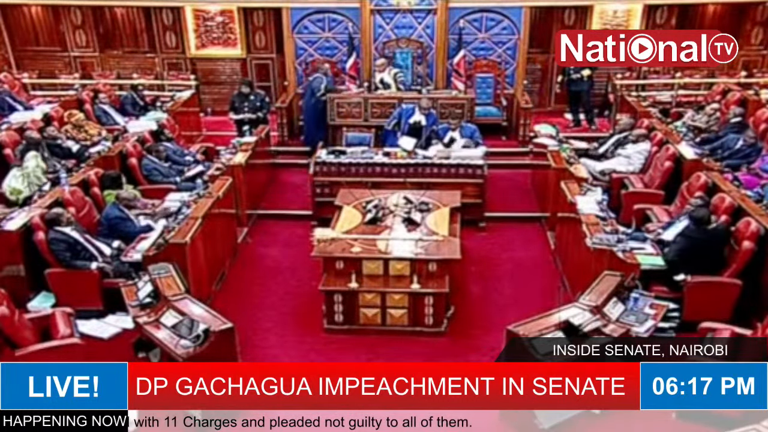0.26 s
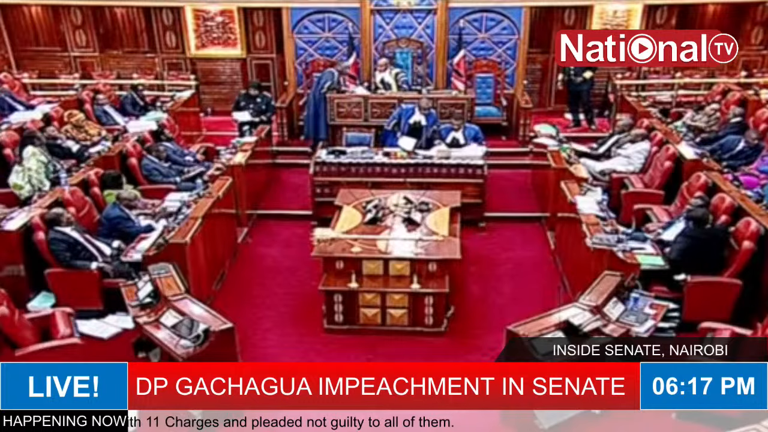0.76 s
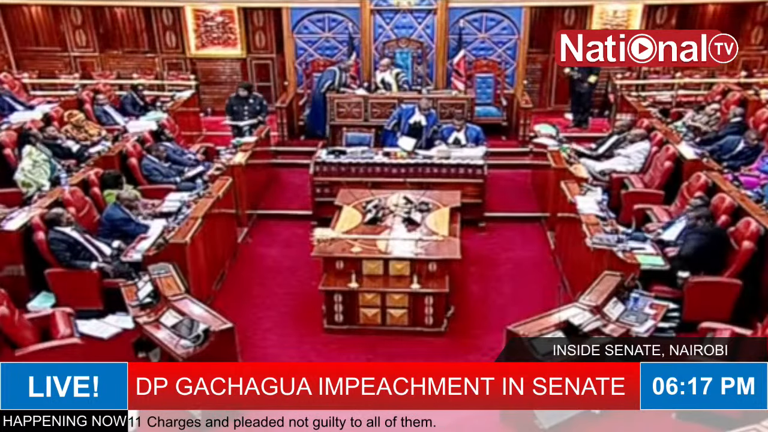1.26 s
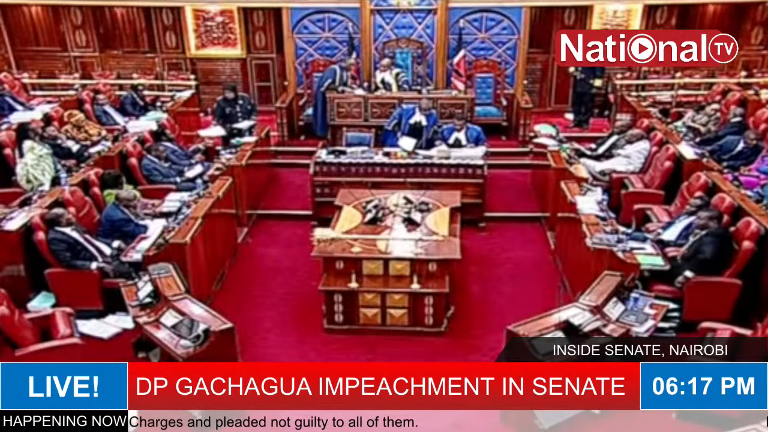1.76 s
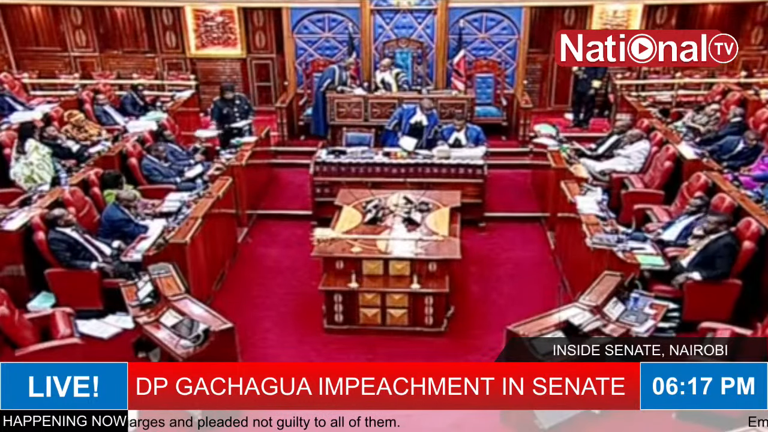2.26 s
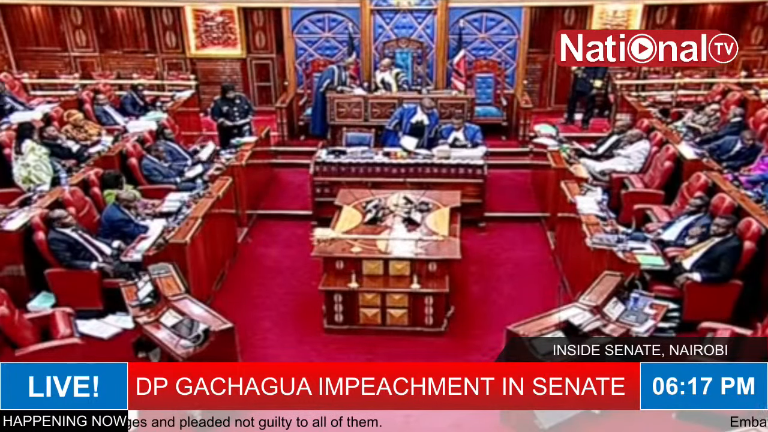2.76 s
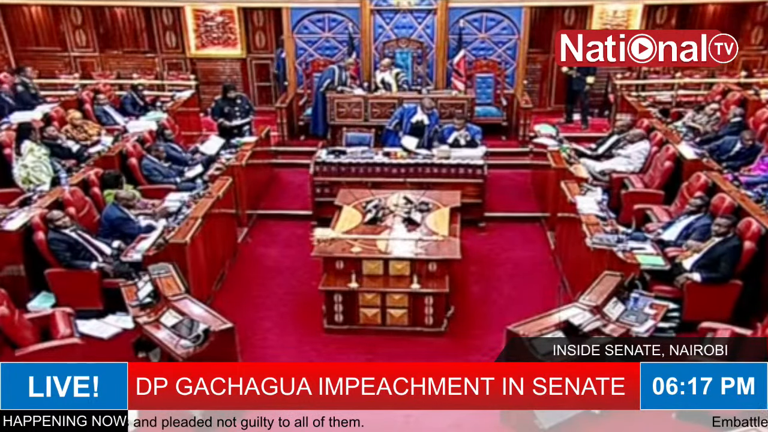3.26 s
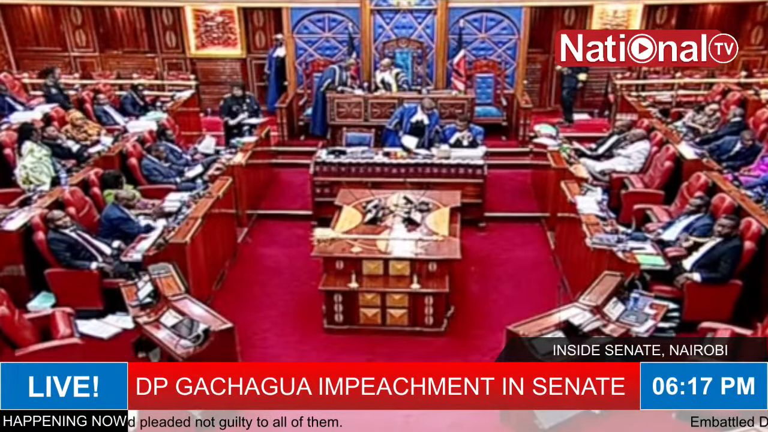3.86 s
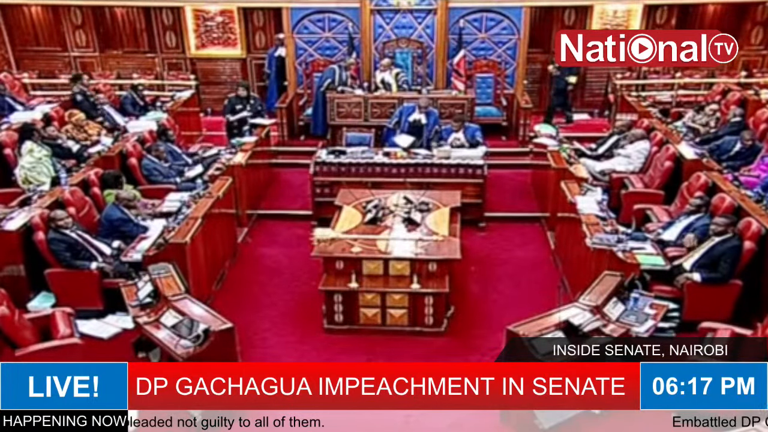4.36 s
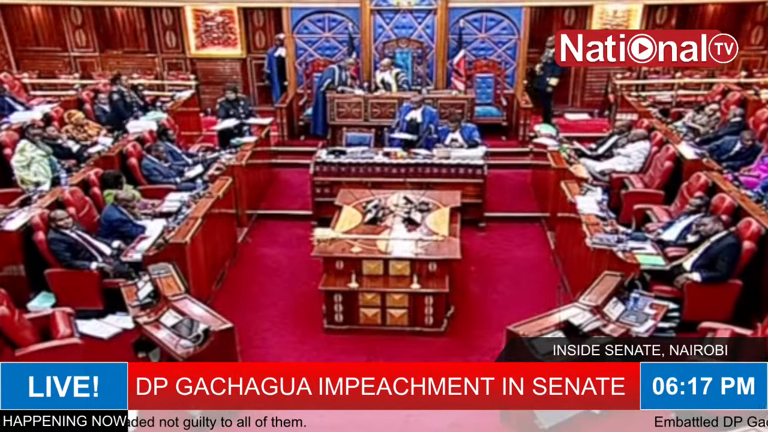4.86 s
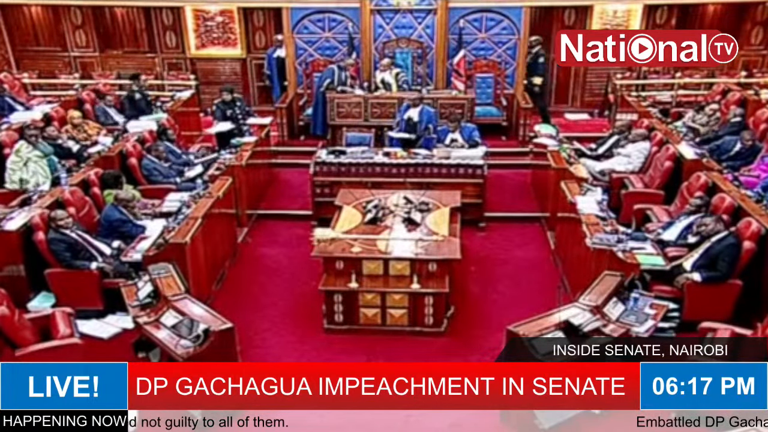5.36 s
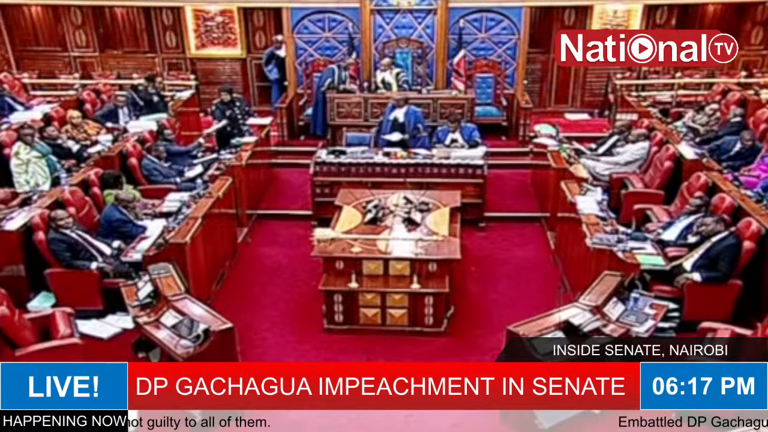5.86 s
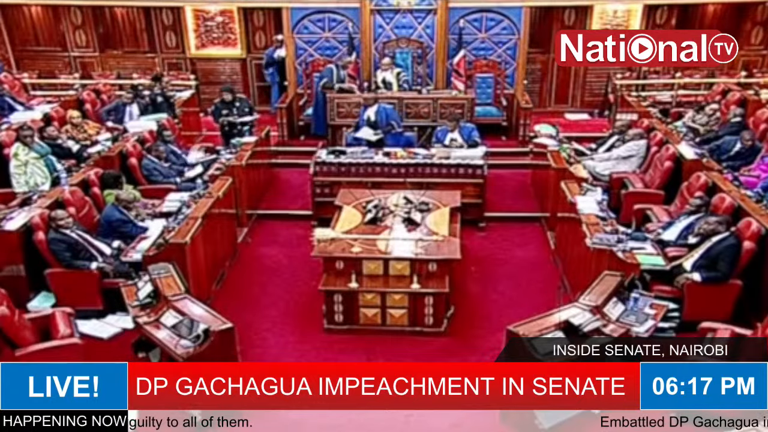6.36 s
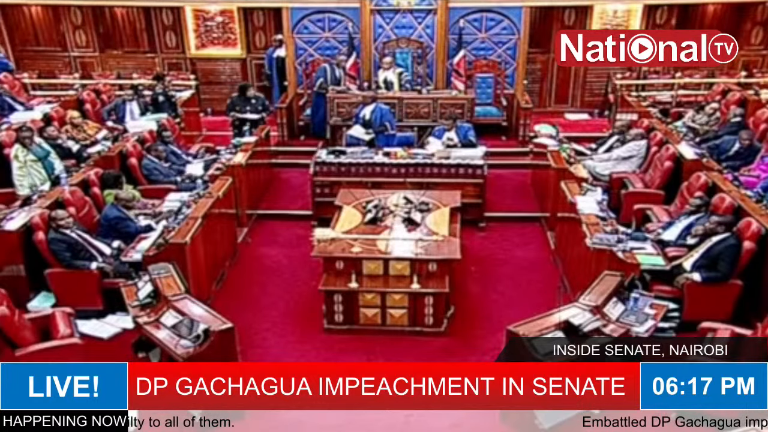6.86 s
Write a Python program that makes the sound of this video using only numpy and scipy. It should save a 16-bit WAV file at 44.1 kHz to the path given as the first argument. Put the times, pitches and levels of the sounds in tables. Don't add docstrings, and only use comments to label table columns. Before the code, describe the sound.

Steady ground-loop buzz fills the whole stretch, low and droning with a slightly hard edge. Above it sit a faint high electronic whine, an even thinner throbbing whistle, and soft hiss fluttering with the buzz. No events occur, and nothing from the large chamber is audible. The sound is close, dry and centred, with no microphone space and a steep cut in the extreme treble.

```python
import sys
import numpy as np
from scipy import signal
from scipy.fft import rfft, irfft
from scipy.io import wavfile

SR = 44100
rng = np.random.default_rng(int(sys.argv[2]) if len(sys.argv) > 2 else 0)


def boost_factor(decibels):
    exponent = np.asarray(decibels, float) / 20
    return 10 ** exponent


def transcribe(u):
    v = np.clip(np.atleast_2d(u).T, -1, 1)
    q = np.round(v * 32767).astype(np.int16)
    wavfile.write(sys.argv[1], SR, q)


N = 313110
T = np.arange(N) / SR
CYCLE = np.linspace(0, 2 * np.pi, 8193)


def mains_angle():
    mean_hz, swing_hz = 49.62371, .017196
    lowest_s, swing_s = 1.6368, 14.7065
    hz = mean_hz - swing_hz * np.cos(2 * np.pi * (T - lowest_s) / swing_s)
    return 2 * np.pi * np.cumsum(hz) / SR - .98


def over_cycle(mains, wave):
    return np.interp(mains % (2 * np.pi), CYCLE, wave)


def tone(angle, db):
    return np.sqrt(2) * boost_factor(db) * np.cos(angle)


def slow(top_hz):
    hz = np.fft.rfftfreq(N, 1 / SR)
    x = irfft(rfft(rng.standard_normal(N)) / (1 + (hz / top_hz) ** 6), N)
    return x / x.std()


# frequency [Hz], level [dB per Hz].
HISS_SPECTRUM = [
    (15, -97.5),
    (300, -102.3),
    (1000, -94.5),
    (1500, -94),
    (2500, -102.8),
    (4200, -108.6),
    (6500, -110),
    (15200, -111.1),
]
# centre [Hz], width [Hz], mains angle [rad], peak change [dB].
CHANGEOVERS = [
    (3000, 1300, 1.12, -5.5),
    (2960, 1300, 1.53, 2),
    (5000, 750, .75, 3),
    (8500, 3000, 1.5, 0.5),
]


def hiss(mains):
    hump_hz, hump_width_hz = 900, 900
    swell_db, swell_rad, flecks_db = 1.44, .85, 0.58
    sharpness = 14
    hz, db = np.transpose(HISS_SPECTRUM)
    bins = np.fft.rfftfreq(N, 1 / SR)
    color = boost_factor(np.interp(np.log(bins + 1), np.log(hz), db)) * np.sqrt(SR / 2)
    noise = rfft(rng.standard_normal(N)) * color

    def ride(centre_hz, width_hz, ride_db):
        band = np.exp(-((bins - centre_hz) / width_hz) ** 4)
        return irfft(noise * band, N) * (boost_factor(ride_db) - 1)

    swell = swell_db * np.cos(2 * (mains - swell_rad)) + flecks_db * slow(60)
    out = irfft(noise, N) + ride(hump_hz, hump_width_hz, swell)
    for centre_hz, width_hz, rad, peak_db in CHANGEOVERS:
        pulse = np.exp(sharpness * (np.cos(2 * (mains - rad)) - 1))
        out += ride(centre_hz, width_hz, peak_db * pulse)
    return out


def splits():
    blocks, hz = N // 1024 + 3, np.fft.rfftfreq(2048, 1 / SR)
    a, b = rng.standard_normal((2, blocks, len(hz)))
    chance, place = rng.random((2, blocks, 1))
    centre_hz = 5800 + 8400 * place
    band = (chance < .12) & (abs(hz - centre_hz) < 800)
    spectra = ((a + 1j * b) * band).T
    x = signal.istft(spectra, window=("gaussian", 250), nperseg=2048, noverlap=1024)[1][644:][:N]
    return boost_factor(-90.5) * x / x.std()


# centre [Hz], half width [Hz], level [dB rms].
GRAIN_PATCHES = [
    (148.8, 20, -77.3),
    (5002.5, 22, -91),
    (10057, 22, -92),
    (248, 10, -95),
]


def grain():
    out = 0
    for hz, half_hz, db in GRAIN_PATCHES:
        angle = 2 * np.pi * hz * T
        out += boost_factor(db) * (slow(half_hz) * np.cos(angle) + slow(half_hz) * np.sin(angle))
    return out


# centre [Hz], lowest and highest even multiple of the mains, level [dB rms].
FOLDED_LINES = [
    (2240.18, -2, 4, -84.3),
    (2240.18, 6, 10, -93),
    (2184.19, -2, 2, -87.7),
    (2613.45, -2, 4, -91),
]


def folded_lines(mains):
    out = 0
    for hz, low, high, db in FOLDED_LINES:
        for k in range(low, high + 1, 2):
            start = 2 * np.pi * rng.random()
            out += tone(2 * np.pi * hz * T + k * mains + start, db)
    return out


# frequency [Hz], beats per second, level of each [dB rms], a silent moment [s].
MOTOR_PAIRS = [
    (97.46, .6, -79, 3.39),
    (325.32, .6, -90, 2.0),
    (26.5, 1.4, -92, 1.0),
]


def motors():
    out = 0
    for hz, beat, db, silent_s in MOTOR_PAIRS:
        since = T - silent_s
        out += tone(2 * np.pi * hz * since, db) - tone(2 * np.pi * (hz + beat) * since, db)
    return out


# frequency [Hz], level [dB rms].
DRIVE_LINES = [
    (2039.5, -83),
    (2913, -85),
    (3111, -90),
    (3155, -96),
    (3212, -94),
    (7391.5, -99),
    (12820, -100),
    (13116, -98),
    (15313, -101),
]


def drive():
    wander = 2 * np.pi * np.cumsum(.0004 * slow(1.5)) / SR
    out = 0
    for hz, db in DRIVE_LINES:
        start = 2 * np.pi * rng.random()
        out += tone(hz * (2 * np.pi * T) + min(hz, 3000) * wander + start, db)
    return out


FIRST_HZ, SECOND_HZ = 5002.464, 5004.97
# multiple of the mains, first converter [dB rms], second converter [dB rms].
DOUBLED_SIDEBANDS = [
    (-5, -103, -93),
    (-3, -106, -100),
    (-1, -102, -100),
    (1, -75.5, -73),
    (3, -102, -96.5),
]
# silent moment [s], level one second away from it [dB rms].
TRIPLED_TONES = [
    (5.0, -94),
    (2.8, -94),
]


def beating_whine(mains):
    nominal_s, null_s = 3.4, 12.8
    shrink = (null_s - T) / (null_s - nominal_s)
    first, second = (2 * np.pi * hz * (T - 3.447) for hz in (FIRST_HZ, SECOND_HZ))
    out = 0
    for k, first_db, second_db in DOUBLED_SIDEBANDS:
        sideband = round(k) * mains
        out += shrink * tone(2 * first + sideband, first_db) - tone(2 * second + sideband, second_db)
    for angle, (silent_s, db) in zip((first, second), TRIPLED_TONES):
        out += (silent_s - T) * tone(3 * angle, db)
    return out


# multiple of the mains, level [dB rms].
WHINE_SIDEBANDS = [(-34, -99), (-24, -98), (-22, -93), (-18, -100), (-12, -91.2), (-10, -91), (-8, -89.6),
                   (-6, -82.6), (-4, -77.5), (-2, -80), (0, -70.6), (2, -79.8), (4, -88.2), (6, -100),
                   (10, -93.2), (14, -95.5), (16, -90.5), (18, -94.3), (26, -99)]


def whine(mains):
    sweep = 0
    for k, db in WHINE_SIDEBANDS:
        quadrature = 1.92 * (k != 0)
        sweep = sweep + boost_factor(db) * np.exp(1j * (round(k) * (CYCLE + .52) - .03 * k ** 2 + quadrature))
    carrier = np.exp(2j * np.pi * FIRST_HZ * T)
    first = np.sqrt(2) * (over_cycle(mains, sweep) * carrier).real
    return first + tone(2 * np.pi * SECOND_HZ * T, -92.5)


# multiple of the mains, level [dB rms].
HUM_OVERTONES = [(1, -59.5), (2, -87), (3, -51), (5, -63.3), (7, -69), (9, -70.5), (11, -76), (13, -82.5),
                 (15, -69.5), (19, -73.5), (21, -84.5), (23, -86), (25, -78.5), (27, -79.5), (29, -85),
                 (31, -78), (33, -86.5), (35, -85), (37, -82), (39, -86.5), (41, -90.5), (47, -85),
                 (49, -83), (55, -91.5), (65, -93), (67, -92)]
FAMILY_ANGLES = (1.36, -3.02, 2.24)
TAIL_SPAN = (43, 97)


def hum_tail(mains):
    first, last = TAIL_SPAN
    first_db, db_per_order, scatter_db = -93, -0.0513, 1
    listed = [round(k) for k, db in HUM_OVERTONES]
    out = 0
    for k in range(first, last + 1, 2):
        if k in listed:
            continue
        start, chance = rng.random(2)
        db = first_db + db_per_order * (k - first) + scatter_db * 2 * (2 * chance - 1)
        out += tone(k * mains + 2 * np.pi * start, db)
    return out


def hum(mains):
    out = 0
    for k, db in HUM_OVERTONES:
        order = round(k)
        spread = -.1 * order ** 2
        out += tone(order * (mains - .18) + spread + FAMILY_ANGLES[order % 3], db)
    return out


def scene():
    mains = mains_angle()
    background = boost_factor(0.31) * hiss(mains) + grain()
    strays = folded_lines(mains) + motors() + drive()
    converters = beating_whine(mains) + whine(mains)
    buzz = over_cycle(mains, hum_tail(CYCLE) + hum(CYCLE))
    line = background + strays + converters + buzz
    return np.array([line, line])


def top_cut(x):
    return signal.sosfilt(signal.butter(12, 15280, fs=SR, output="sos"), x)


def record(dry):
    mix = dry + np.array([[1], [-1]]) * splits()
    return top_cut(mix)


dry = scene()
out = record(dry)
transcribe(out)
```